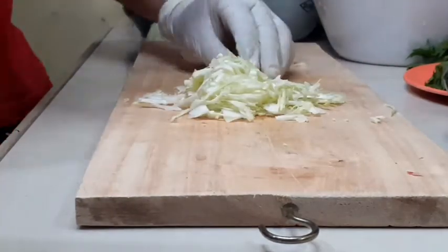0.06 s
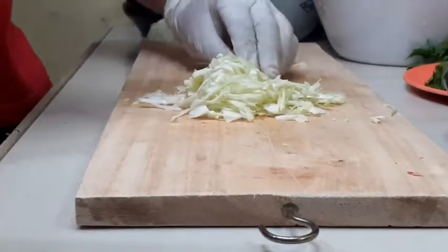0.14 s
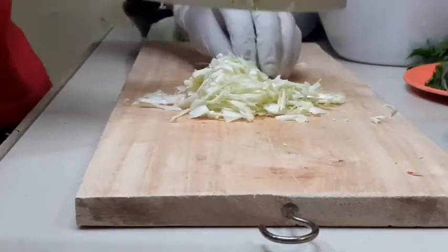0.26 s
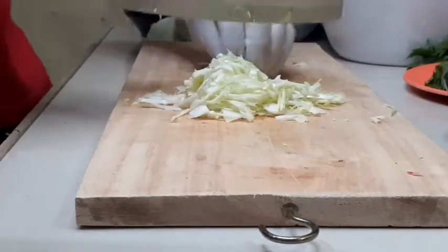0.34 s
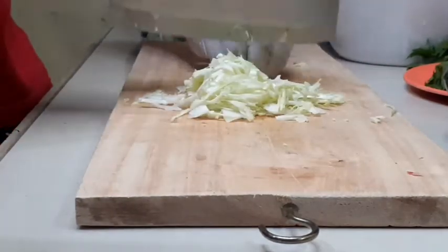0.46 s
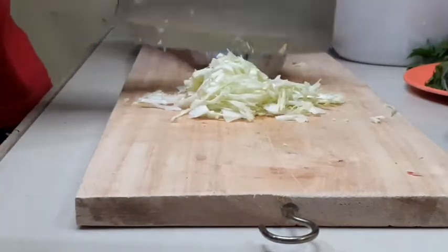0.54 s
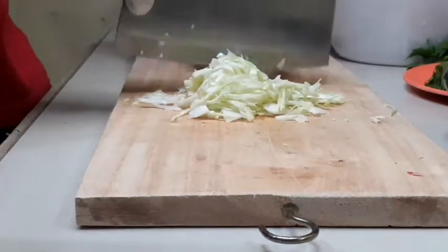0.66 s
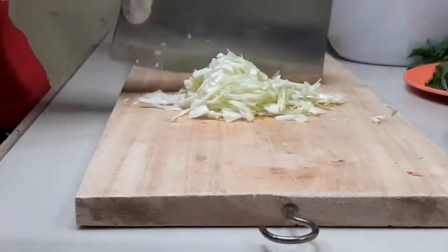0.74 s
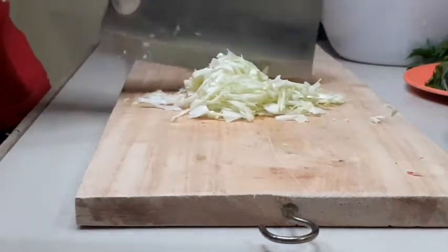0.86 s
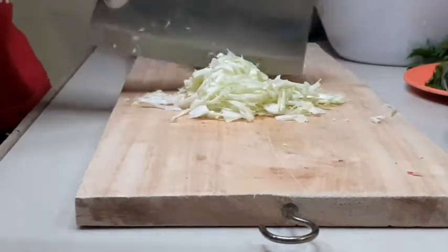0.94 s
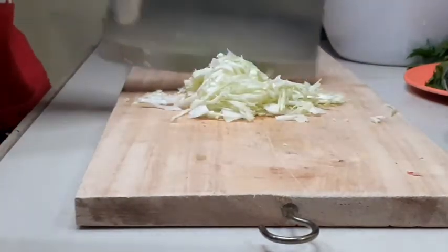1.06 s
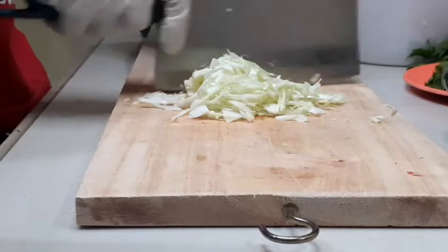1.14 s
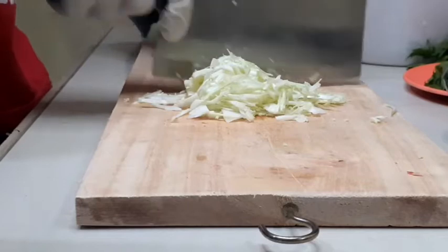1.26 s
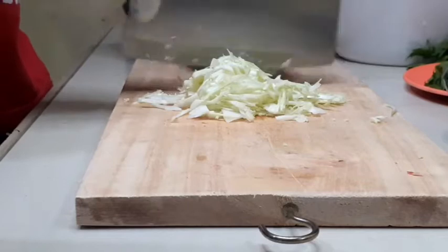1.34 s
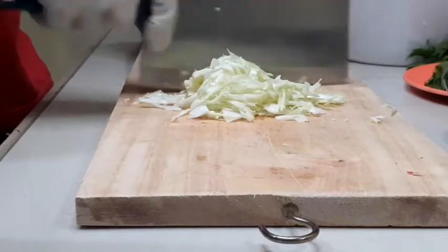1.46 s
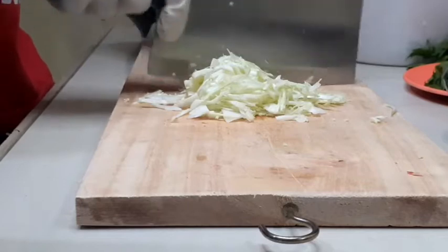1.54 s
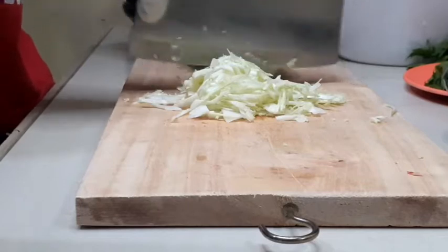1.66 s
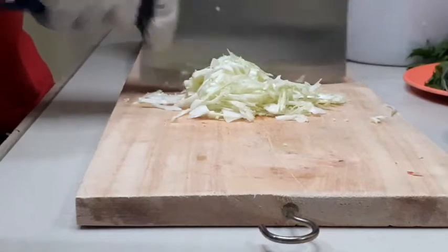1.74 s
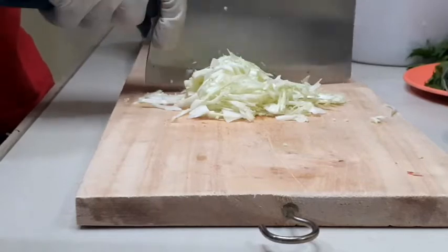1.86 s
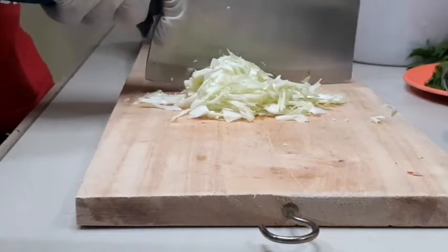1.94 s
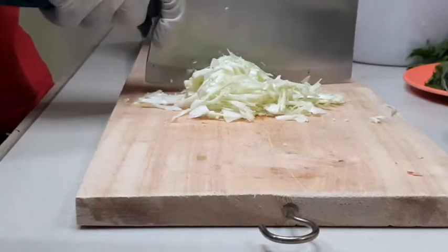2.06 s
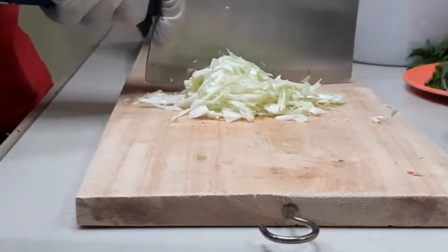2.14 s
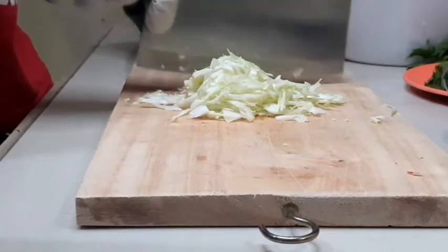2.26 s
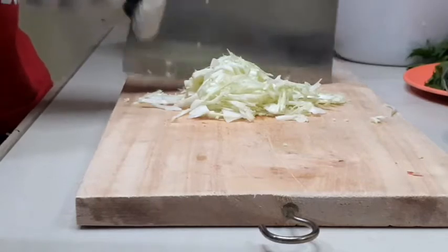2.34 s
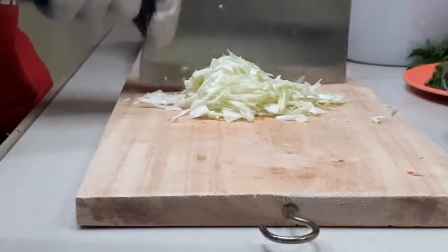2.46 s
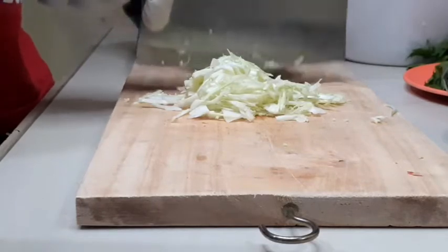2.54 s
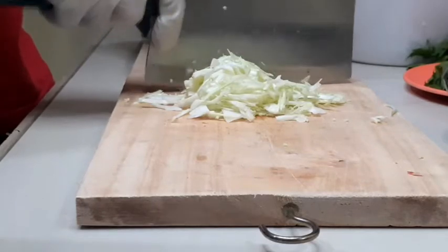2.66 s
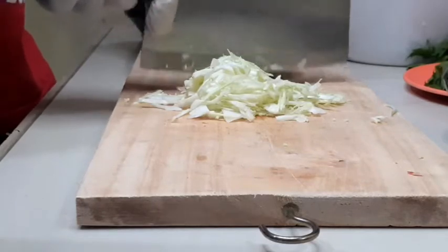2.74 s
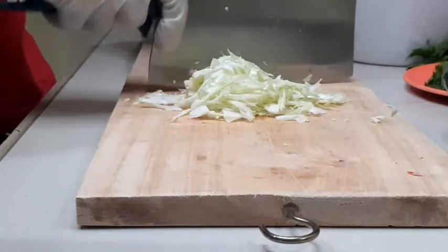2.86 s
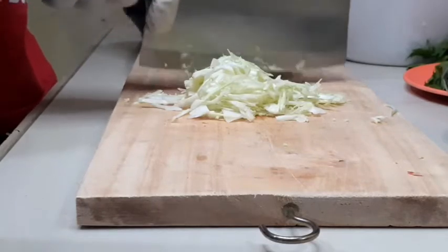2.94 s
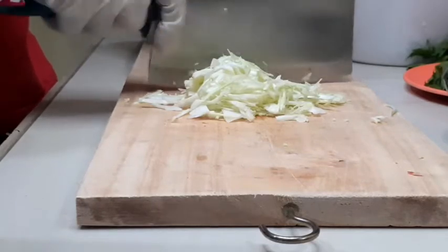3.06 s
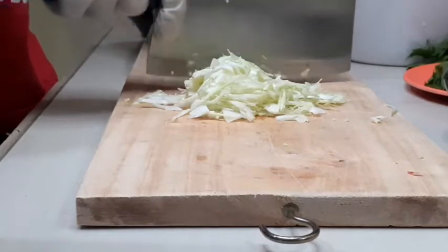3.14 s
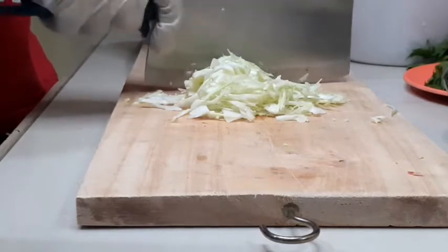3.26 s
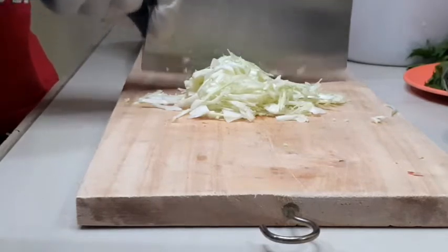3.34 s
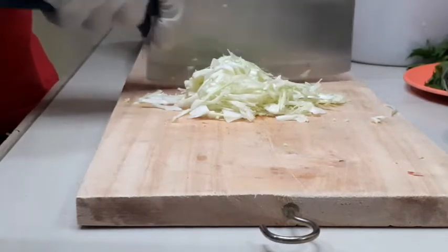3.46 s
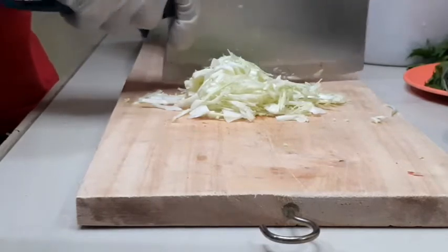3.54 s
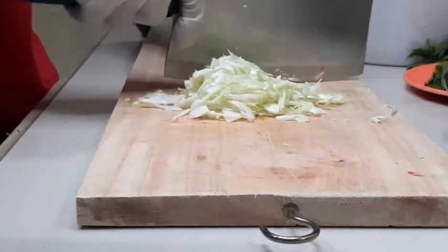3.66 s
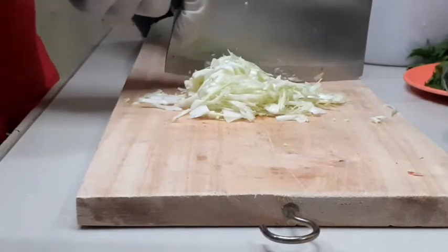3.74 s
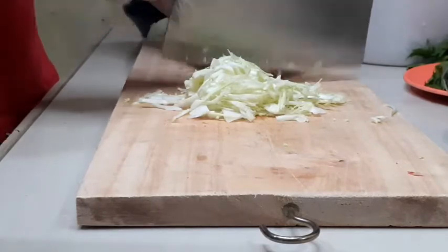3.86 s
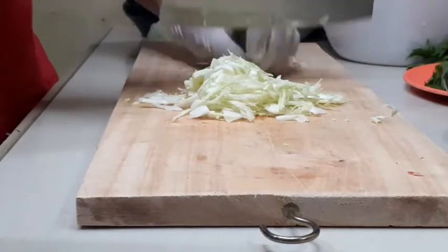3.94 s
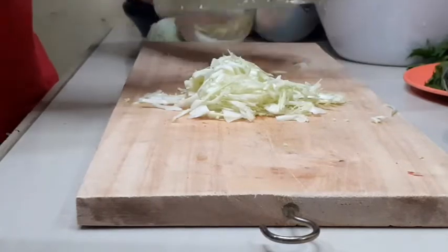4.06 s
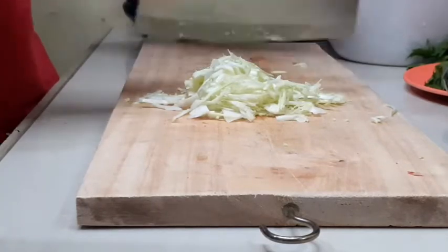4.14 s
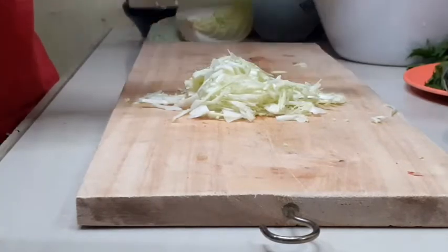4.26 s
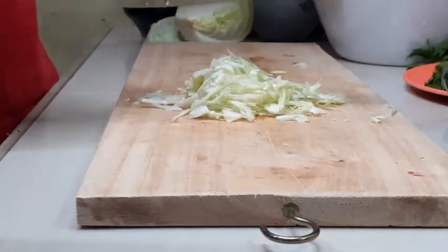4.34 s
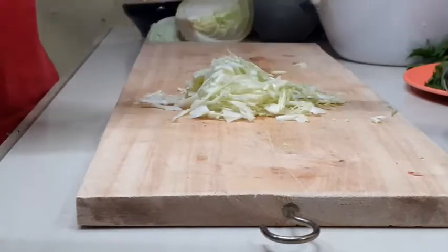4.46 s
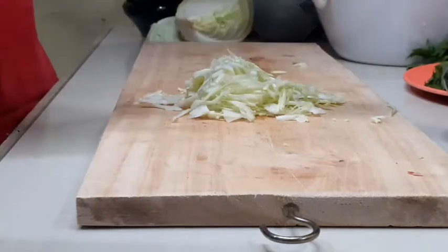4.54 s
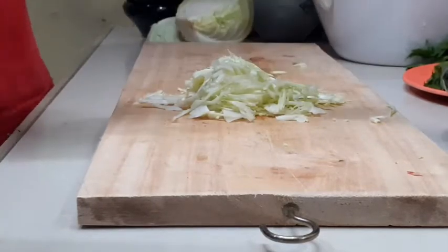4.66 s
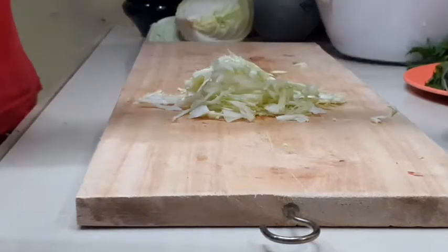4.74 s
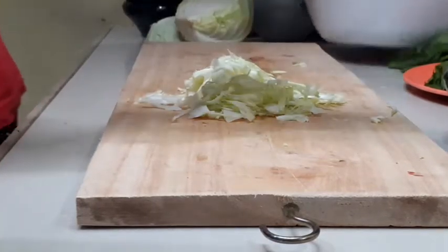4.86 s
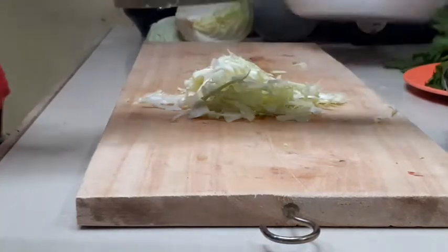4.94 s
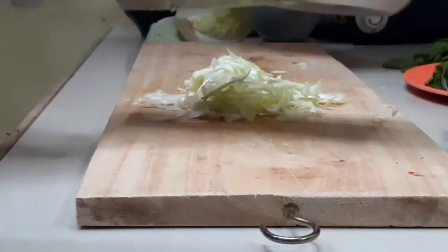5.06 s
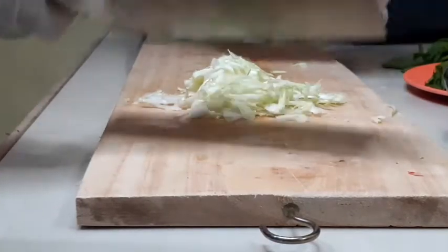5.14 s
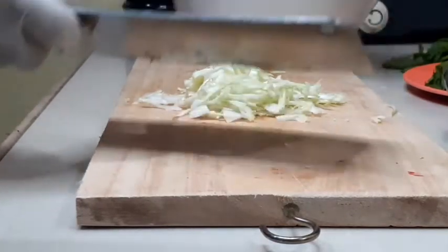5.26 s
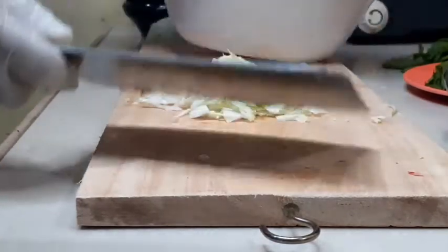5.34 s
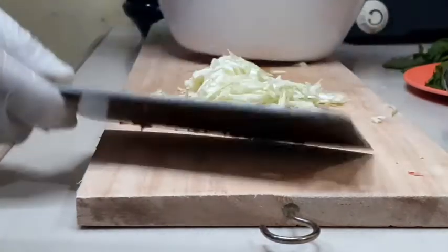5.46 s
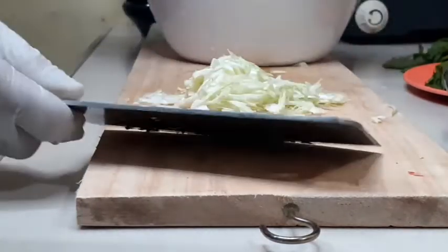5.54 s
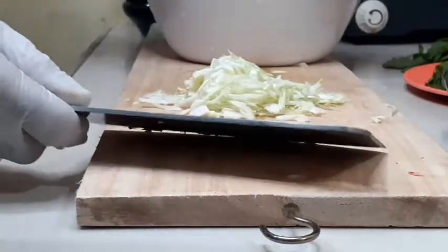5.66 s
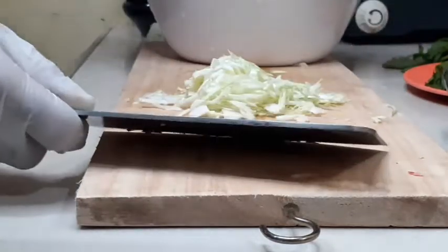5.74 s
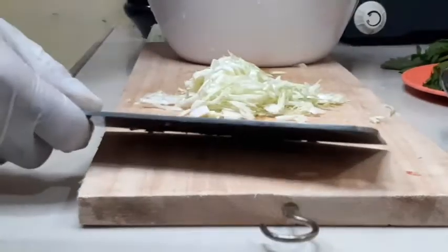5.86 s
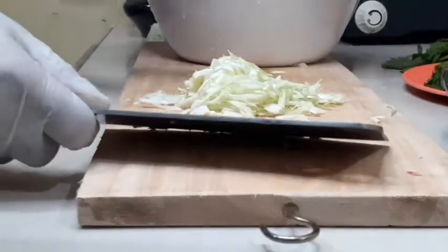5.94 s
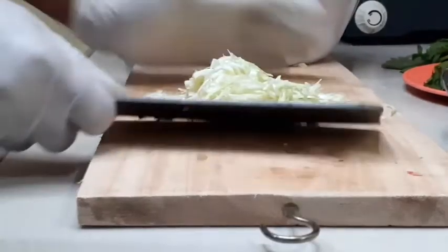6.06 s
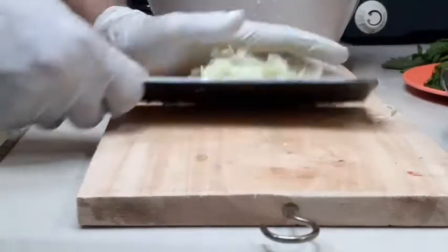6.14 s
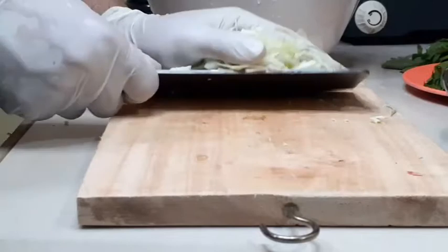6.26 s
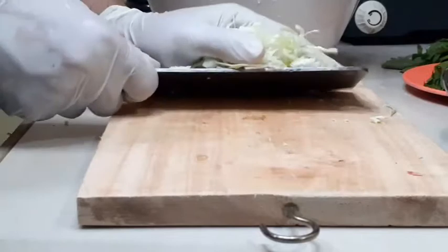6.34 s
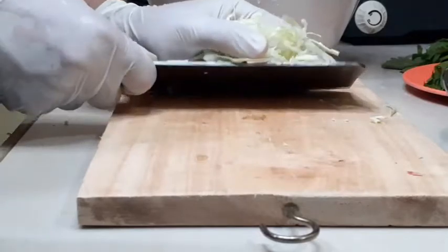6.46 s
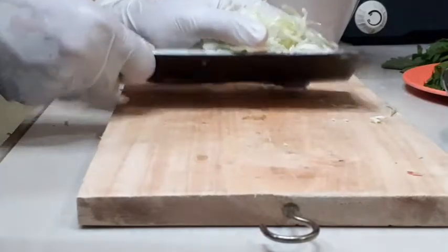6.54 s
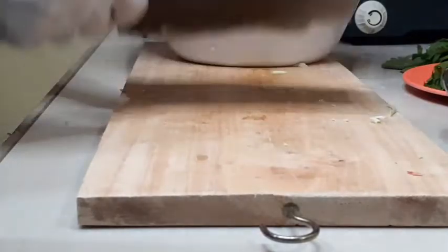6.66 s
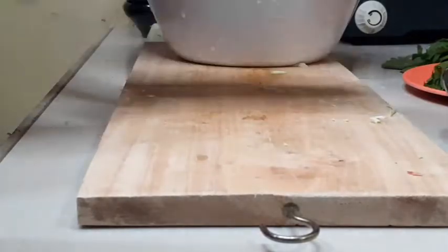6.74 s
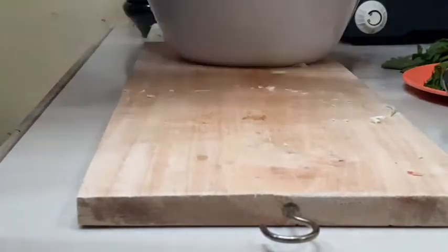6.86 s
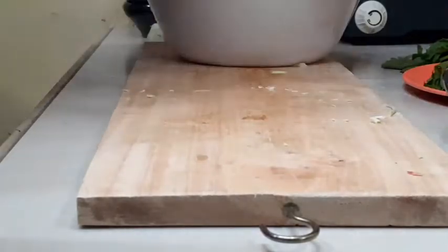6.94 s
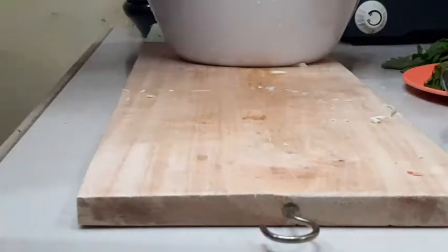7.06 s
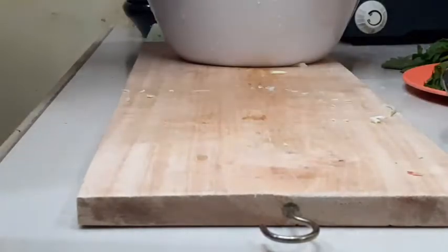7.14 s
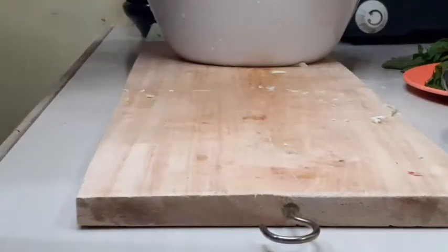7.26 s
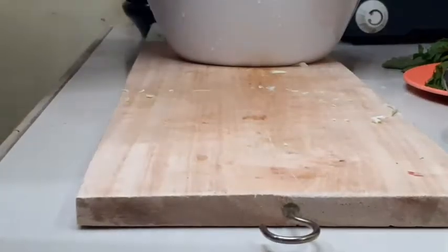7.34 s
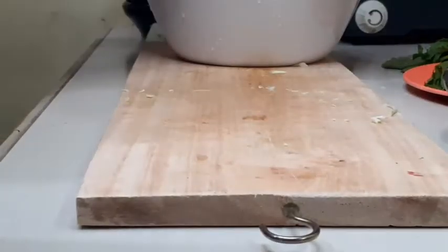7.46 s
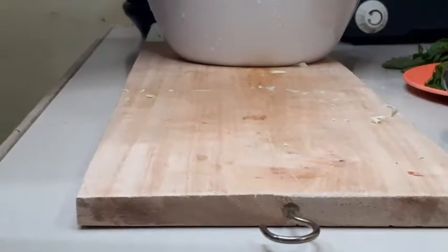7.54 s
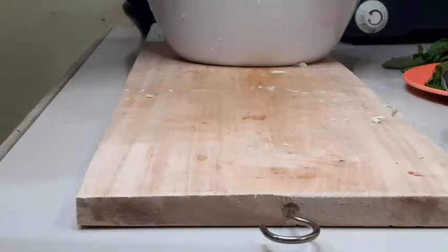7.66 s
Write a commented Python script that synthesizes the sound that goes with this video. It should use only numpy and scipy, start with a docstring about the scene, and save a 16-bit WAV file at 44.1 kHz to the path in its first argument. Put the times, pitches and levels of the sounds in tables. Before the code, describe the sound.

A heavy cleaver crunches through cabbage and knocks a thick wooden board eight times, then shreds rustle, a plastic bowl thumps down and the blade scrapes.

```python
"""A small hard kitchen, a phone close by: a cleaver crunches through cabbage and knocks on a thick wooden board.
Then shreds are gathered, a plastic bowl is set down, the blade scrapes the board and the heap drops in the bowl.
Blows ring the modes of board or bowl with a thud and a tick; leaves, glove and blade rub as dense noisy snaps.
Underneath lie a low rumble, soft swells and a thin far hiss of filtered noise, and a motor drone of sine orders."""
import sys
import numpy as np
from scipy import signal
from scipy.fft import rfft, irfft, next_fast_len
from scipy.io import wavfile
from scipy.ndimage import uniform_filter1d

SR = 44100
rng = np.random.default_rng(int(sys.argv[2]) if len(sys.argv) > 2 else 0)


def waveform_to_disk(signal):
    """Save audio, clipped to [-1, 1], as 16-bit WAV at the path in sys.argv[1]."""
    frames = np.transpose(np.atleast_2d(signal))
    scaled = np.clip(frames, -1, 1) * 32767
    samples = np.round(scaled).astype(np.int16)
    wavfile.write(sys.argv[1], SR, samples)


N = 340011  # samples in the scene

# Rumble of house and street. Each row: time in seconds, level in dB.
RUMBLE_LEVEL = [(0, -54.5), (.2, -44), (.4, -43), (.55, -51), (1.0, -47.5), (1.9, -54.5), (2.6, -44),
                (3.4, -50.5), (4.1, -64), (4.5, -47.5), (5.1, -57.5), (5.7, -62.5), (6.1, -48.5),
                (6.5, -50), (7.3, -48.5), (7.71, -47)]
# Resonances of the rumble. Each row: centre in Hz, width in Hz, relative level in dB.
HOUSE_MODES = [(55, 50, -2), (107, 33, -0.3), (123, 90, -8), (166.5, 4, -4.5), (226.4, 39, -10.5),
               (266, 17, -12), (329, 53, -11.5), (466.6, 14, -23), (516, 30, -25)]
# Airy noise above the rumble. Each row: time in seconds, level in dB.
AIR_LEVEL = [(0, -87), (.2, -73), (.35, -59), (.5, -72), (.8, -73), (2.1, -59), (5, -61.5), (6.5, -60.5),
             (7, -57.5), (7.71, -65.5)]
# Colour of the airy noise. Each row: frequency in Hz, relative density in dB per Hz.
AIR_COLOUR = [(180, -30.5), (300, 6), (377, -8), (438, -1), (494, -20), (684, -12.5), (804, -15.5),
              (4000, -45.5), (5200, -73.5), (8800, -120)]
# Thin far hiss. Each row: start in seconds, rise in seconds, hold in seconds, level in dB.
HISS_STROKES = [(4.85, 0.2, 0.45, -78.5), (5.76, 0.055, 0.22, -74), (5.8, 1.9, .4, -67)]
# Bands of the far hiss. Each row: centre in Hz, width in Hz, relative level in dB.
HISS_BANDS = [(3650, 710, -1.5), (6260, 6000, -16)]
# Soft dull swells in the background. Each row: start in seconds, rise in seconds, hold in seconds,
# level in dB, centre in Hz, width in Hz.
DULL_SWELLS = [(.23, 0.044, 0.11, -86, 1400, 700), (.48, 0.034, 0.075, -76, 600, 244),
               (2.0, 0.041, 0.18, -69.5, 780, 149.2), (4.93, 0.057, 0.17, -75.5, 1250, 700)]
# Passing motor. Each row: time in seconds, level of the lowest order in dB, gain of the orders above in dB.
DRONE_LEVEL = [(3.55, -70, -87.5), (3.68, -47, -59.5), (3.92, -46.5, -59.5), (4.03, -45.5, -68),
               (4.2, -49, -52), (4.52, -43, -61.5), (4.7, -41, -53.5), (4.9, -40.5, -65.5),
               (5.22, -43, -61.5), (5.6, -65, -77)]
# Motor orders 2 to 8. Each entry: relative level in dB.
DRONE_ORDERS = [4.5, 1.5, 4.5, -16.5, -21, -29, -13]

# Glove squeaking on the blade. Each row: time in seconds, pitch in Hz, level in dB.
SQUEAK_PATH = [(0.788, 3540, -92), (0.81, 3920, -64.5), (0.845, 3870, -60), (0.875, 3600, -72),
               (0.885, 2400, -72), (0.91, 2000, -80)]
# Blade in the leaves. Each row: start in seconds, length in seconds, level in dB, tilt in dB per octave.
CUTS = [(0.87, 0.068, -71, 2), (0.944, 0.055, -66, -4), (1.021, 0.075, -46.5, 3), (1.342, 0.03, -47.5, 2),
        (1.363, 0.019, -38, 1), (1.651, 0.036, -43, 0), (2.303, 0.011, -42, 1.5), (2.533, 0.0077, -42, 4),
        (2.73, 0.0067, -34, 0.5), (2.959, 0.031, -41.5, -0.5), (3.37, .02, -62.5, -3.5),
        (3.381, 0.021, -53.5, -0.7), (3.442, 0.0026, -49.5, 3), (3.702, .01, -67.5, 2.5),
        (3.709, .004, -53.5, 3.5), (6.415, 0.0028, -68.5, -2.7)]
# Colour of the snapping leaves. Each row: frequency in Hz, relative density in dB per Hz.
CRUNCH_COLOUR = [(880, -21), (1500, 0.5), (3120, -11.5), (3630, -7), (4570, -7), (6620, -7), (9990, -12.5),
                 (15200, -15), (16500, -38)]
# Small hard taps among the hand work. Each row: start in seconds, gain in dB, centre in Hz, width in Hz.
TAPS = [(1.041, -53, 1300, 600), (3.715, -72, 1587, 600), (4.277, -78, 900, 900), (4.293, -60, 436, 251),
        (4.294, -66, 1290, 150), (4.599, -64, 2600, 1400), (5.474, -44, 520, 300), (5.4855, -37, 470, 240),
        (7.56, -69, 1150, 200), (7.561, -67, 2300, 500)]

# Blade meets board. Each row: start in seconds, level in dB, tilt in dB per octave, tick in dB against the ring.
CHOPS = [(1.051, -27, 0.84, -33.5), (1.392, -31, -1, -21), (1.685, -35, -1.2, -13.5), (2.315, -31, 1, -33),
         (2.545, -25, 2.5, -44), (2.753, -34, -1.5, -52), (2.9905, -38.5, -7, -36), (3.176, -29, 0, -37.5)]
# Modes of the board. Each row: frequency in Hz, relative level in dB, time to fall 60 dB in seconds.
BOARD_MODES = [(120.1, -19, 0.04), (290.4, 3, 0.16), (366, -0.5, 0.21), (425.7, -7, 0.23),
               (484, 1.5, 0.035), (541, 3, 0.055), (611, 0.5, 0.055), (714, 0.5, 0.049), (879.7, 2.5, 0.14),
               (909, 7, 0.15), (1163, 0.5, 0.068), (1572, 3.5, 0.041), (2225, -8, 0.045),
               (2907, -23.5, 0.048)]
# Colour of the thud on the board. Each row: frequency in Hz, relative density in dB per Hz.
BOARD_THUD_COLOUR = [(53, -35), (90, -11.5), (226, -9.5), (294, -2.5), (659, -1.5), (873, -2), (1010, -5.5),
                     (1140, -7), (1340, -7), (8000, -53.5), (10400, -68), (17600, -120)]
# Bowl touches down. Each row: start in seconds, level in dB, tilt in dB per octave, tick in dB against the ring.
BOWL_KNOCKS = [(5.218, -26.5, 4.03, -11.5), (5.440, -43.5, 5, -9), (5.488, -40, 2, -9)]
# Modes of the bowl. Each row: frequency in Hz, relative level in dB, time to fall 60 dB in seconds.
BOWL_MODES = [(211.6, -8.5, 0.074), (320, -2, 0.023), (360.6, 8, 0.14), (567, 2, 0.02), (705, -3, 0.095),
              (1190, -6, .06), (1348, -14, 0.15), (1810, -13, 0.12), (2406, -12.5, 0.26),
              (3550, 12.5, 0.087), (5240, -28.5, .02)]
# Colour of the bowl's thud. Each row: frequency in Hz, relative density in dB per Hz.
BOWL_THUD_COLOUR = [(53, -39.5), (90, -15), (262, -8.5), (361, -11.5), (404, -22), (546, -4.5), (923, -18),
                    (1200, -20.5), (1820, -23.5), (8000, -48.5), (10400, -62.5), (17600, -120)]

# Shreds gathered by hand. Each row: start in seconds, rise in seconds, hold in seconds, level in dB,
# tilt in dB per octave.
GATHERING = [(4.275, 0.0067, 0.061, -58, -0.5), (4.34, 0.065, 0.09, -53.5, 5),
             (4.47, 0.054, 0.035, -50, 6.5), (4.595, 0.0056, .03, -50, 0.5)]
# Colour of the gathered shreds. Each row: frequency in Hz, relative density in dB per Hz.
GATHER_COLOUR = [(290, -19), (500, 10), (1390, -8), (1790, -5), (4620, -11), (8300, -14), (10200, -19),
                 (12300, -16.5), (15800, -21), (16500, -57)]
# Bowl sliding. Each row: start in seconds, rise in seconds, hold in seconds, level in dB, tilt in dB per octave.
SLIDING = [(5.438, 0.002, 0.096, -39.5, 0.095)]
# Colour of the slide. Each row: frequency in Hz, relative density in dB per Hz.
SLIDE_COLOUR = [(290, -4.5), (500, -28), (1260, -3.5), (1410, -22), (2390, -5.5), (2610, -10),
                (3350, -12.5), (13600, -33), (15800, -25), (16500, -55)]
# Blade along the board. Each row: start in seconds, rise in seconds, hold in seconds, hiss level in dB,
# tilt in dB per octave, board ring level in dB.
SCRAPING = [(5.883, .01, 0.062, -66, 1, -74), (5.94, 0.075, 0.067, -51.5, 0.5, -44),
            (6.085, 0.021, .045, -45, 1, -46.5), (6.165, 0.012, 0.02, -51, -0.5, -60)]
# Colour of the scraping hiss. Each row: frequency in Hz, relative density in dB per Hz.
SCRAPE_COLOUR = [(880, -4.5), (1500, -14.5), (3780, -16.5), (4760, -22), (5310, -15.5), (15100, -23),
                 (16000, -13), (16500, -50.5)]
# Board and blade under the scraping edge. Each row: centre in Hz, width in Hz, relative level in dB.
SCRAPE_RING = [(291, 50, 11.5), (610, 110, 3), (874, 39, 5), (1163, 60, 4), (1326, 160, 3.5),
               (1576, 150, 0), (2100, 41, -9), (2640, 73, -17), (3220, 140, -14), (3880, 300, -12)]
# Heap dropping. Each row: start in seconds, rise in seconds, hold in seconds, level in dB, tilt in dB per octave.
DROPPING = [(7.318, 0.036, 0.062, -44, 1), (7.553, 0.0068, 0.026, -52, -1)]
# Colour of the falling heap. Each row: frequency in Hz, relative density in dB per Hz.
DROP_COLOUR = [(290, -4.5), (500, -4), (847, -12), (1170, -3.5), (1450, -17.5), (1840, -6), (3450, -14),
               (4970, -21.5), (14700, -41), (15800, -31), (16500, -66)]
# Dying away after a stroke. Each entry: kind of stroke, time constant in seconds.
FADE_S = {"gather": 0.02, "slide": 0.032, "scrape": 0.013, "drop": 0.062, "hiss": .06}

# Decay of the kitchen. Each row: frequency in Hz, time to fall 60 dB in seconds.
ROOM_T60 = [(100, 0.95), (260, 0.47), (700, 0.49), (1840, 0.39), (4850, 0.36), (12800, .33)]
# Likeness of the two microphone ports. Each row: frequency in Hz, left-right correlation.
PORT_LIKENESS = [(60, 0.93), (300, .9), (700, 0.33), (1500, .25), (4000, 0.11), (14000, .02)]
# Balance of the two ports. Each row: frequency in Hz, left minus right in dB.
PORT_BALANCE = [(60, -5), (1000, -4.5), (8000, -5.5), (13000, 0.5)]

# The kitchen: straight path, counter and wall echoes with their span, diffuse tail
DIRECT_DB, EARLY_DB, EARLY_S, LATE_DB = -3, 2, 0.022, -1.5
DIRECT_TOP_HZ = 2500  # hand and heap shade the straight path above this
SPAN = 1 << 15  # samples in a room response
# Paths straight to the phone: hand work unshaded, taps and mode ring through the counter
NEAR_DB, TAP_NEAR_DB, RING_NEAR_DB = -4, -3, 2.0
SIDE_LAG = 9  # samples the side part of the near hand work is delayed
MIC_HISS_DB, MIC_LOW_HZ, TOP_HZ = -77.5, 75.6, 16300  # hiss before port balance and cuts; lower and upper cut

CONTACT_S = 0.00053  # how long the push of a blow lasts
LANDING_S = 0.0007  # edge or rim lands along its length, so a blow swells briefly
BOARD_THUD_DB, BOWL_THUD_DB = 7.5, 4  # broad thud against the ring
BOARD_SCATTER_DB, BOWL_SCATTER_DB = 2.5, 1.1  # how the shares of the modes change from blow to blow
SNAP_SCATTER_DB = 2.0  # how much the snaps of rubbing differ in size
UNEVEN_DB, UNEVEN_PER_S = 1.5, 45  # rubbing catches and lets go
WAVER_DB = 1.5  # spread of the rumble's wavering
DRONE_HZ = 53.8  # lowest motor order, before its slow drift


def undb(db):
    """Turn dB into an amplitude factor."""
    return 10 ** (np.asarray(db) / 20)


def unit(x):
    """Bring the effective (rms) level to 1."""
    return x / np.sqrt(np.mean(x ** 2, axis=-1, keepdims=True))


def at(table, hz):
    """Read a (Hz, value) table on a log axis."""
    table_hz, values = np.transpose(table)
    return np.interp(np.log(np.maximum(hz, 1)), np.log(table_hz), values)


def shape(x, gain):
    """Filter by a gain that is a function of frequency."""
    size = next_fast_len(x.shape[-1])
    hz = np.arange(size // 2 + 1) * SR / size
    return irfft(rfft(x, size) * gain(hz), size)[..., :x.shape[-1]]


def octave_band(x, centre_hz):
    """Pass one octave band that overlaps its neighbours with straight slopes."""
    return shape(x, lambda f: np.maximum(1 - abs(np.log2(np.maximum(f, 1) / centre_hz)), 0))


def resonances(table, f):
    """Gain of several resonances whose powers add."""
    return np.sqrt(sum(undb(2 * db) / (1 + (2 * (f - hz) / width) ** 2) ** 2 for hz, width, db in table))


def pulse(gain, size):
    """The shortest causal pulse with this colour (folded cepstrum)."""
    ceps = irfft(np.log(gain(np.arange(size // 2 + 1) * SR / size)))
    ceps[1:size // 2] *= 2
    ceps[size // 2 + 1:] = 0
    return irfft(np.exp(rfft(ceps)))


def spread(mid, side):
    """Left and right share the bass and part in the treble."""
    def alike(hz):
        return np.clip(at(PORT_LIKENESS, hz), 0, 1)

    m = shape(mid, lambda hz: np.sqrt((1 + alike(hz)) / 2))
    s = shape(side, lambda hz: np.sqrt((1 - alike(hz)) / 2))
    return np.array([m + s, m - s])


def curve(table):
    """Columns as sample curves; the level is silent outside the table, further columns hold their ends."""
    s, db, *rest = np.transpose(table)
    t = np.arange(N) / SR
    return [np.interp(t, s, undb(db), left=0, right=0)] + [np.interp(t, s, c) for c in rest]


def waver(rate):
    """Slow chance, spread 1: noise averaged twice over 1/rate seconds."""
    size = int(SR / rate)
    return unit(uniform_filter1d(uniform_filter1d(rng.standard_normal(N), size=size), size=size))


def strokes(table, fade_s):
    """Each stroke swells, holds and dies away; further columns follow the stroke that is loudest."""
    t = np.arange(N) / SR
    s, rise, hold, db, *rest = np.transpose(table)[..., None]
    swell = np.sin(np.pi / 2 * np.clip((t - s) / rise, 0, 1)) ** 2
    gains = undb(db) * swell * np.exp(-np.maximum(t - s - rise - hold, 0) / fade_s)
    total = gains.sum(axis=0)
    return [total] + [(gains * c).sum(axis=0) / (total + 1e-12) for c in rest]


def tilted(x, tilt_db, pivot_hz):
    """Octave bands weighted by a tilt that moves in time."""
    out = 0
    for hz in 31.25 * 2. ** np.arange(10):
        out = out + octave_band(x, hz) * undb(np.clip(tilt_db, -8, 8) * np.log2(hz / pivot_hz))
    return out


def crackle(rate, scatter_db):
    """Dense snaps of uneven size, rate per second."""
    chance = rng.random((N, 2))
    snaps = chance[:, 0] < rate / SR
    sizes = undb(-scatter_db * np.log(1 - chance[:, 1]))
    return unit(snaps * sizes * rng.standard_normal(N))


def rooms(count):
    """Stereo responses from several spots: direct sound, a cluster of early echoes, a tail dying band by band."""
    t = np.arange(SPAN) / SR
    noise = rng.standard_normal((count, 2, SPAN))
    tail = 0
    for hz in 62.5 * 2. ** np.arange(9):
        tail = tail + octave_band(noise, hz) * undb(-60 * t / at(ROOM_T60, hz))
    early = undb(EARLY_DB) / (1 + np.exp(np.minimum((t - EARLY_S) / 0.0057, 50))) / np.sqrt(EARLY_S * SR)
    late = undb(LATE_DB) * (1 - np.exp(-t / 0.035)) / np.sqrt(0.013 * SR)
    onset = np.minimum(t / 0.0033, 1)
    mid, side = (tail * (early + late) * onset).transpose(1, 0, 2)
    responses = spread(mid, side).transpose(1, 0, 2)
    responses += undb(DIRECT_DB) * pulse(lambda f: 1 / np.sqrt(1 + (f / DIRECT_TOP_HZ) ** 2), SPAN)
    return responses


def swells(noise):
    """Each swell is one band of noise that rises and fades."""
    out = 0
    for *stroke, hz, width in DULL_SWELLS:
        band = unit(shape(noise, lambda f: resonances([(hz, width, 0)], f)))
        out = out + strokes([stroke], FADE_S["hiss"])[0] * band
    return out


def motor():
    """A motor's orders are whole multiples of one slowly drifting turning rate."""
    turn = 2 * np.pi * np.cumsum(DRONE_HZ * (1 + 0.017 * waver(2))) / SR
    upper = sum(undb(db) * np.sin(k * turn + k * k) for k, db in enumerate(DRONE_ORDERS, 2))
    lowest_gain, upper_db = curve(DRONE_LEVEL)
    return lowest_gain * np.sin(turn) + undb(upper_db) * upper


def backdrop():
    """Wavering resonant rumble of house and street, airy noise, a thin far hiss, dull swells and the motor."""
    noise = spread(*rng.standard_normal((2, N)))
    rumble = unit(shape(noise, lambda f: resonances(HOUSE_MODES, f)))
    rumble = curve(RUMBLE_LEVEL)[0] * undb(WAVER_DB * waver(12)) * rumble
    air = curve(AIR_LEVEL)[0] * unit(shape(noise, lambda f: undb(at(AIR_COLOUR, f))))
    thin = unit(shape(noise, lambda f: resonances(HISS_BANDS, f)))
    thin = strokes(HISS_STROKES, FADE_S["hiss"])[0] * thin
    return rumble + air + thin + swells(noise) + motor()


def squeak():
    """A glove on the blade: a wobbling stick-slip tone with its octave."""
    level, hz = curve(np.array(SQUEAK_PATH)[:, [0, 2, 1]])
    wobble = unit(uniform_filter1d(rng.standard_normal(N), size=SR // 1500))
    turn = 2 * np.pi * np.cumsum(hz * (1 + 0.048 * wobble)) / SR
    return level * (np.sin(turn) + undb(-13) * np.sin(2 * turn))


def crunch():
    """Leaves snap under the edge for as long as it cuts."""
    t, gain, tilt = np.arange(N) / SR, np.zeros(N), np.zeros(N)
    for s, length, db, tilt_db in CUTS:
        attack = np.clip((t - s) / 0.0012, 0, 1)
        gain += undb(db) * attack * np.exp(-np.maximum(t - s - length, 0) / 0.007)
        tilt[t > s] = tilt_db
    snaps = unit(shape(crackle(10000, 4.53), lambda f: undb(at(CRUNCH_COLOUR, f))))
    return gain * tilted(snaps, tilt, 6000.)


def taps():
    """Each tap is one short broad resonance, heard with the room."""
    out = np.zeros((2, N + 2 * SPAN))
    for (s, db, hz, width), room in zip(TAPS, rooms(len(TAPS))):
        click = unit(pulse(lambda f: resonances([(hz, width, 0)], f), SPAN // 4))
        wet = signal.fftconvolve(click[None], room, axes=1)
        wet[:, :len(click)] += undb(TAP_NEAR_DB) * click
        start = int(s * SR)
        out[:, start:start + wet.shape[1]] += wet * undb(db)
    return out[:, :N]


def knocks(table, modes, thud_colour, thud_db, scatter_db):
    """Each blow rings the modes with its own shares, adds a broad thud and a bright tick, and fills the room."""
    out, t = np.zeros((2, N + 2 * SPAN)), np.arange(SPAN // 4) / SR
    hz, db, t60 = np.transpose(modes)[..., None]
    chance = rng.standard_normal((len(table), len(modes), 1))
    push = np.sin(np.pi * np.minimum(t[:200] / CONTACT_S, 1)) ** 2
    sign = (-1.) ** np.arange(len(modes))[:, None]
    tick = unit(pulse(lambda f: (f + 20) / (f + 5000), len(t)))
    for (s, level_db, tilt_db, tick_db), c, room in zip(table, chance, rooms(len(table))):
        def tilt(f):
            return undb(tilt_db * np.log2(np.clip(f, 300, 4000) / 600))

        shares = sign * undb(db + scatter_db * c) * tilt(hz)
        ring = np.sum(shares * np.sin(2 * np.pi * hz * t) * undb(-60 * t / t60), axis=0)
        ring = unit(np.convolve(ring, push)[:len(t)])
        thud = unit(pulse(lambda f: undb(at(thud_colour, f)) * tilt(f), len(t)))
        blow = ring + undb(thud_db) * thud + undb(tick_db) * tick
        wet = signal.fftconvolve(blow[None], room, axes=1)
        wet[:, :len(t)] += undb(RING_NEAR_DB) * ring
        wet *= 1 - np.exp(-np.arange(wet.shape[1]) / SR / LANDING_S)
        wet = unit(wet.ravel()).reshape(wet.shape)  # one level for both ports together
        start = int(s * SR)
        out[:, start:start + wet.shape[1]] += wet * undb(level_db)
    return out[:, :N]


def rubbing(table, fade_s, colour, rate):
    """Leaves, glove or steel dragged over a surface: snaps so dense that they hiss."""
    gain, tilt = strokes(table, fade_s)[:2]
    gain = gain * undb(UNEVEN_DB * waver(UNEVEN_PER_S))
    snaps = unit(shape(crackle(rate, SNAP_SCATTER_DB), lambda f: undb(at(colour, f))))
    return gain * tilted(snaps, tilt, 3700.0)


def board_hum():
    """The scraping edge catches and slips and keeps board and blade sounding."""
    ring = unit(shape(crackle(8000, 2.5), lambda f: resonances(SCRAPE_RING, f)))
    ring_strokes = np.array(SCRAPING)[:, [0, 1, 2, 5]]
    gain = strokes(ring_strokes, FADE_S["scrape"])[0]
    return gain * undb(UNEVEN_DB * waver(UNEVEN_PER_S)) * ring


def scene():
    """Hand work heard near and through the room, with the blows, the squeak and the backdrop."""
    hand_work = crunch()
    hand_work = hand_work + rubbing(GATHERING, FADE_S["gather"], GATHER_COLOUR, rate=13000)
    hand_work = hand_work + rubbing(SLIDING, FADE_S["slide"], SLIDE_COLOUR, rate=9000)
    hand_work = hand_work + rubbing(SCRAPING, FADE_S["scrape"], SCRAPE_COLOUR, rate=9000) + board_hum()
    hand_work = hand_work + rubbing(DROPPING, FADE_S["drop"], DROP_COLOUR, rate=4000)
    wet = signal.fftconvolve(hand_work[None], rooms(count=1)[0], axes=1)[:, :N]
    near = undb(NEAR_DB) * spread(hand_work, np.roll(hand_work, SIDE_LAG))  # keeps the edges sharp
    chops = knocks(CHOPS, BOARD_MODES, BOARD_THUD_COLOUR, BOARD_THUD_DB, BOARD_SCATTER_DB)
    bowl = knocks(BOWL_KNOCKS, BOWL_MODES, BOWL_THUD_COLOUR, BOWL_THUD_DB, BOWL_SCATTER_DB)
    return backdrop() + squeak() + taps() + chops + bowl + wet + near


def record(dry):
    """The capsules hiss faintly, the left port hears less below the top; deepest bass and top are cut."""
    dry = dry + undb(MIC_HISS_DB) * rng.standard_normal(dry.shape)
    ports = shape(dry, lambda f: undb(np.outer([.5, -.5], at(PORT_BALANCE, f))))
    low_cut = signal.butter(4, MIC_LOW_HZ, "high", fs=SR, output="sos")
    top_cut = signal.ellip(10, .2, 70, TOP_HZ, fs=SR, output="sos")
    ports = signal.sosfilt(low_cut, ports)
    return signal.sosfilt(top_cut, np.clip(ports, -1, 1))


dry = scene()
out = record(dry)
waveform_to_disk(out)
```